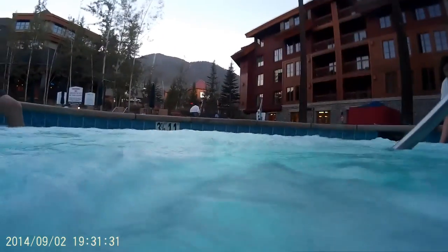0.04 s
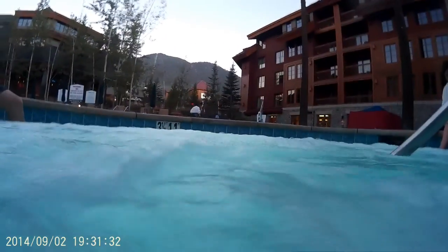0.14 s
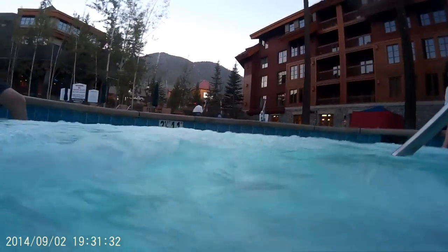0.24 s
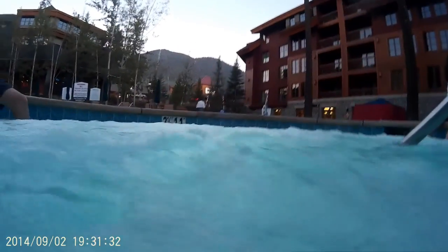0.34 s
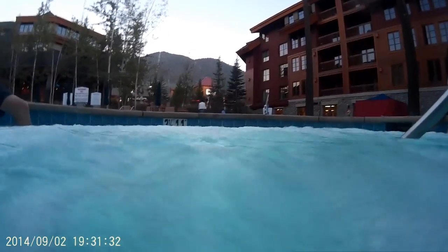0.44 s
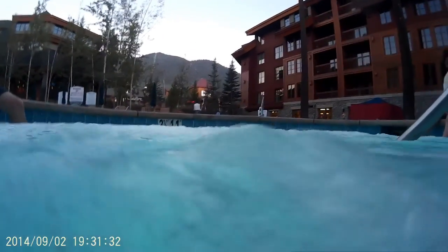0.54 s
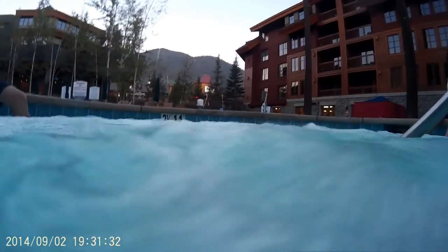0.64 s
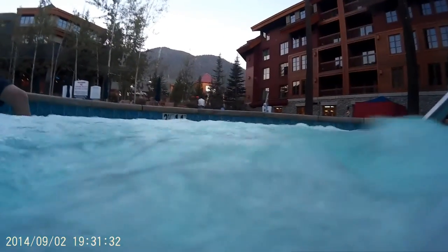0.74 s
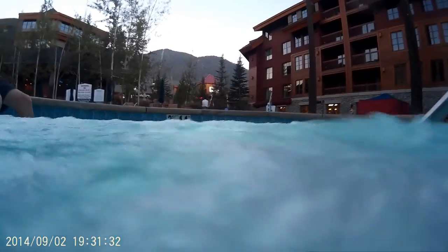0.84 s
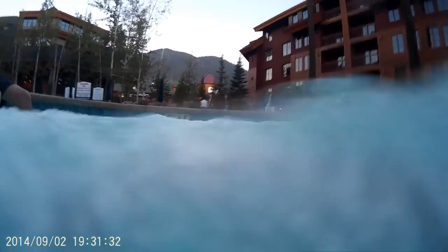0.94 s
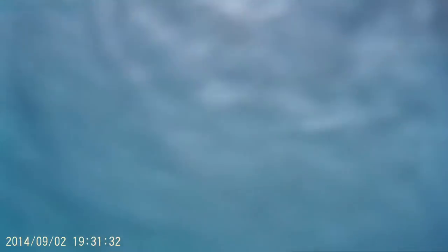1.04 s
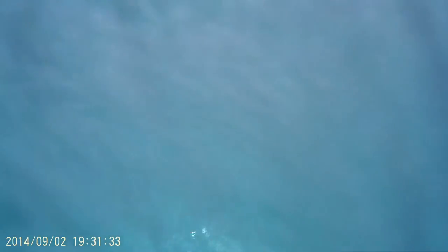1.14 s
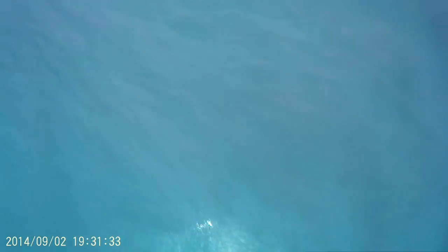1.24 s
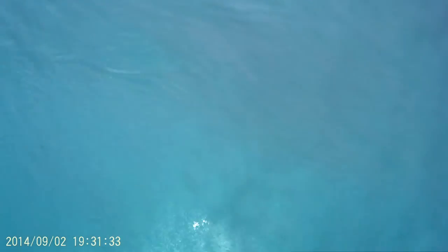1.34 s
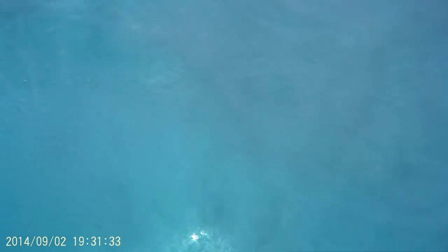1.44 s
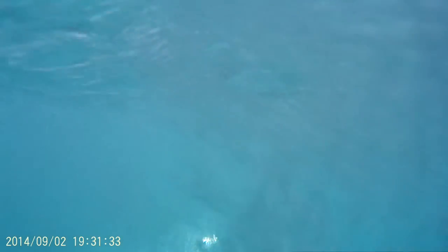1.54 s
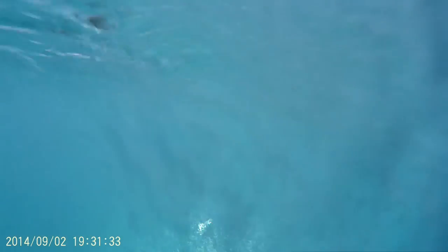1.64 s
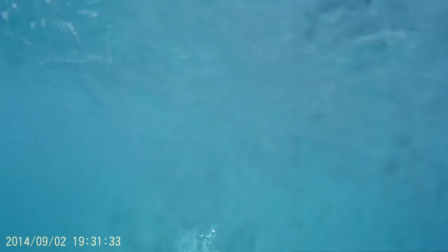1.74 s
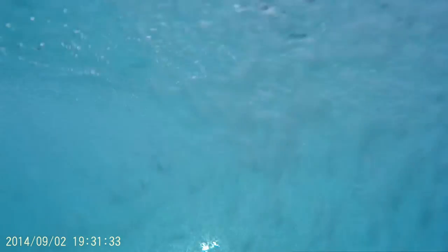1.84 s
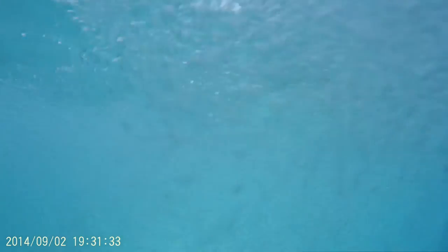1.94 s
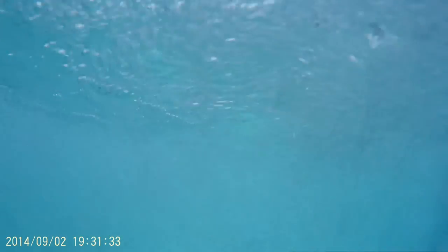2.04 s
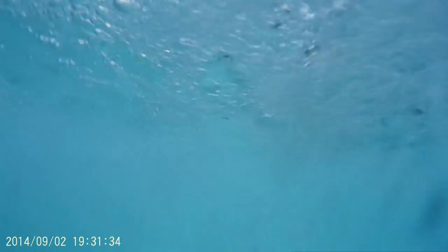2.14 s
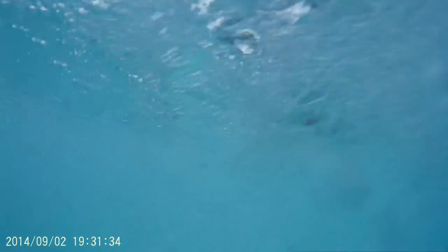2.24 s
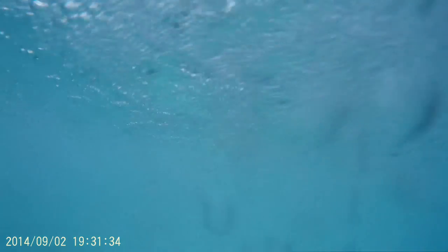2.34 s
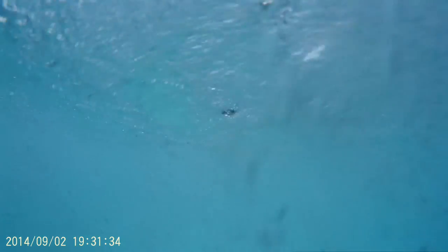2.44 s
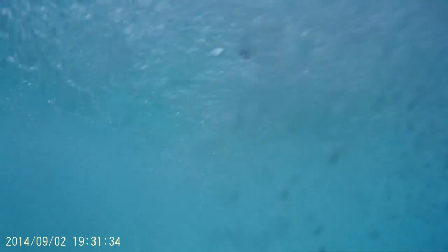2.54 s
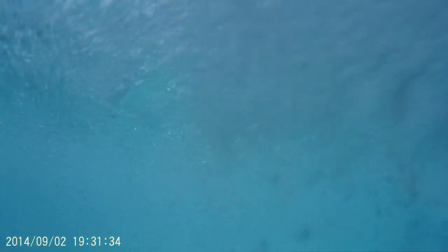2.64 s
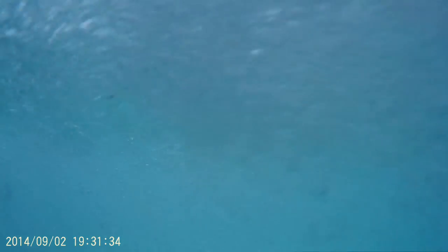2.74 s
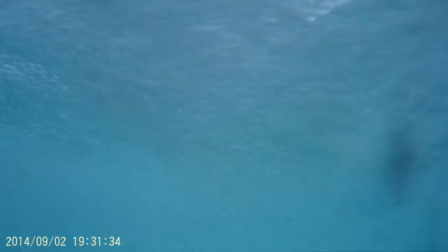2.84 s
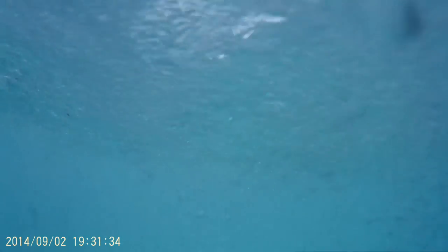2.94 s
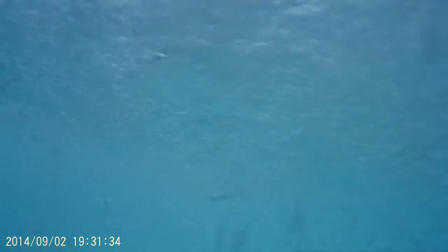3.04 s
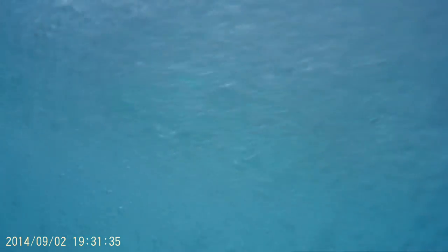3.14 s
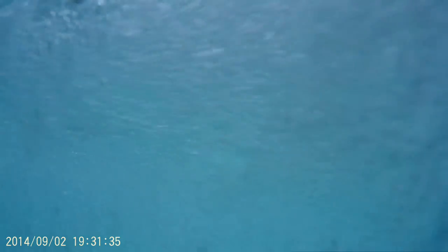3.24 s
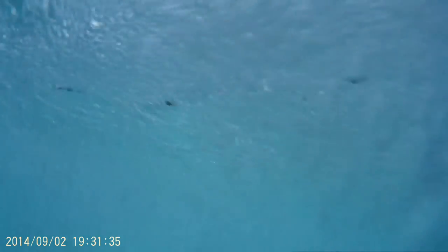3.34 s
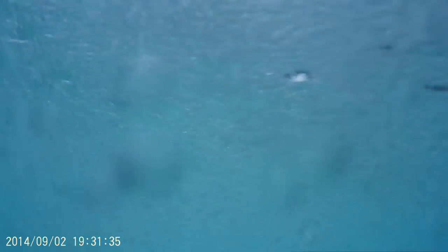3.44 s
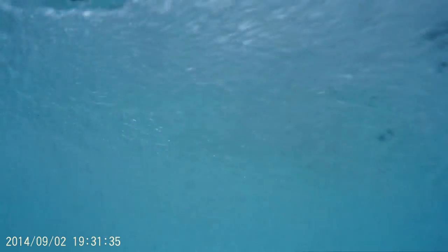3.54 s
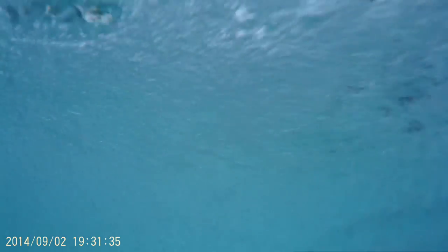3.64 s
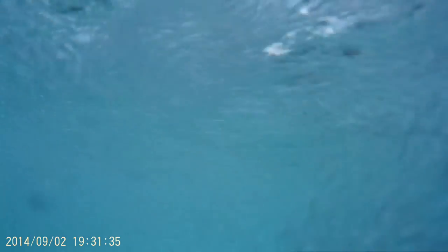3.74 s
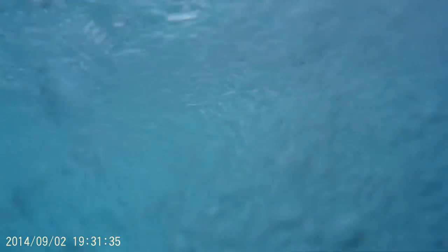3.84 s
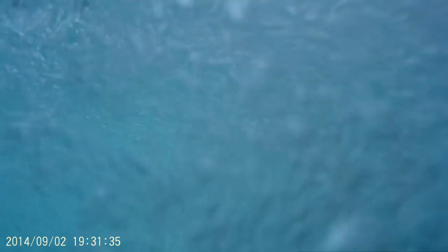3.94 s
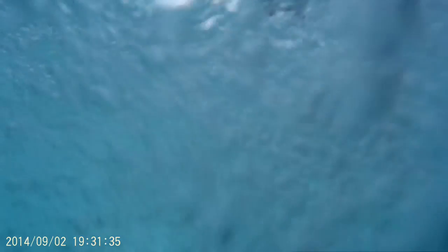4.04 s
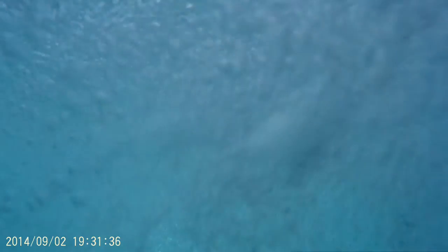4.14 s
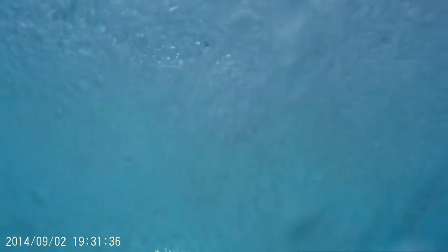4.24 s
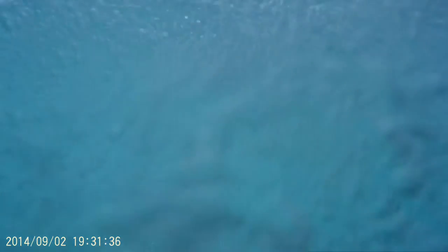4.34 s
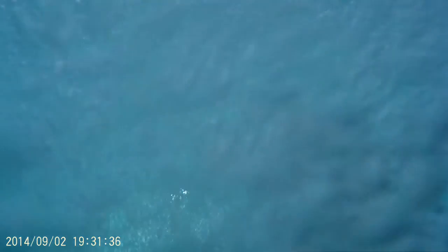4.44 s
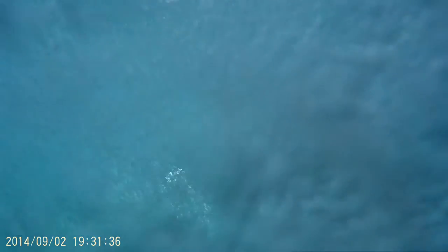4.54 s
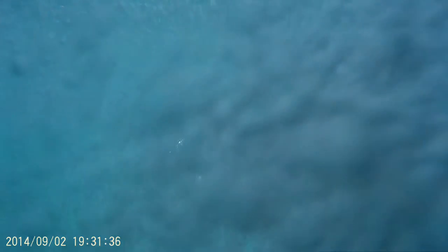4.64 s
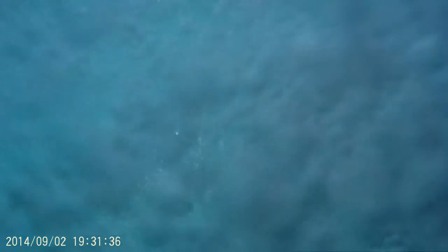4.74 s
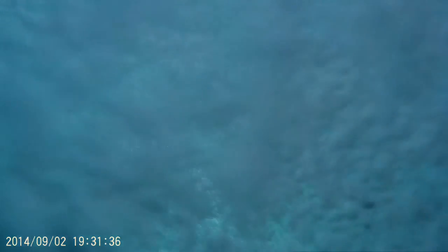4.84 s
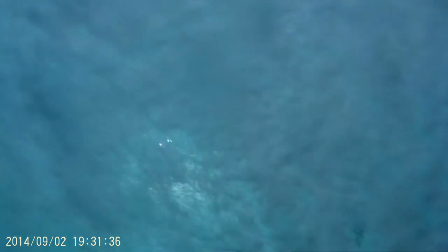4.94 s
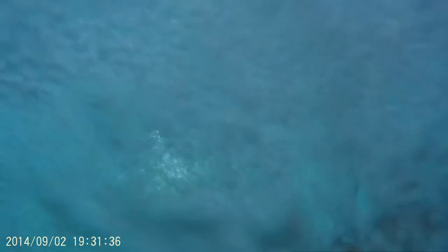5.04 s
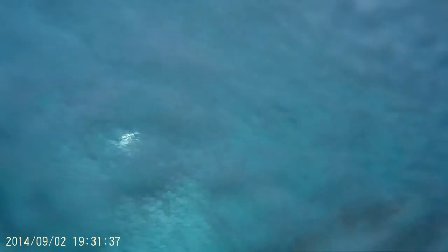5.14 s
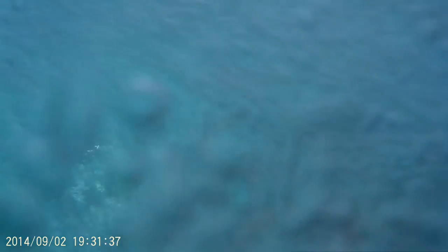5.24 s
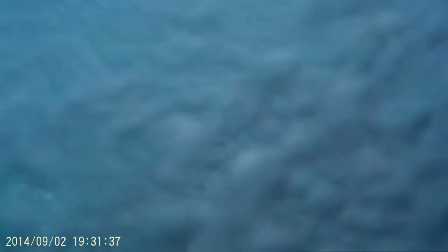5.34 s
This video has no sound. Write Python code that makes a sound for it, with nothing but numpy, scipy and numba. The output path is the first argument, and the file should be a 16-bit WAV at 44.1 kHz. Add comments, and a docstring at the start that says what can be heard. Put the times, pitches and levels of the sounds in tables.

```python
"""Hot tub, under water: a small camera in a sealed housing sinks from the churning surface towards the jets.
Big air pockets throb as a low rumble, made of overlapping sine bubbles that swell, die away and rise in pitch.
Nearby single bubbles plop and tick, and a cloud of small ones fizzes, crackles and surges.
Behind them lie a shaped noise hiss and thin, wavering high whines."""
import sys
import numpy as np
from scipy import signal
from scipy.fft import rfft, irfft
from scipy.io import wavfile
from scipy.ndimage import uniform_filter1d
from numba import njit

SR = 44100
rng = np.random.default_rng(int(sys.argv[2]) if len(sys.argv) > 2 else 0)


def output_pcm(signal):
    """Save a mono or channel-first signal as 16-bit PCM at the path in sys.argv[1].

    Samples are clipped to [-1, 1] before scaling.
    """
    pcm = np.clip(np.atleast_2d(signal).T, -1, 1) * 32767
    wavfile.write(sys.argv[1], SR, np.round(pcm).astype(np.int16))


N = 237072  # length in samples

# Jet rumble over time. Each row: time in seconds, level in dB, centre pitch of the air pockets in Hz.
JET_RUMBLE = [(0.0, -57, 135), (0.66, -62.5, 126), (1.11, -46.5, 153), (1.2, -39.5, 175), (1.68, -32, 127),
              (1.87, -37, 142), (2.05, -24, 120), (2.5, -26, 126), (2.87, -26, 138), (3.19, -27, 148),
              (3.52, -20, 145), (3.79, -22, 119), (3.92, -25, 138), (4.18, -21.5, 163), (4.54, -20.5, 192),
              (4.81, -30.5, 145), (5.21, -26.5, 166), (5.33, -34, 142), (5.38, -22, 134)]
# Tone of the air pockets. Each row: pitch in Hz, relative strength in dB.
POCKET_TONE = [(40, -61), (60, -2), (78, -4.5), (100, -4.5), (140, -3), (200, -4), (260, -5.5), (340, -8.5)]
# Single bubbles near the housing. Each row: time in seconds, peak in dB, pitch in Hz,
# spray of smaller bubbles in dB relative to the peak.
CLOSE_BUBBLES = [(0.0196, -39, 2000, -4), (0.088, -40.5, 1270, -30), (0.092, -41, 1650, -30),
                 (0.0978, -36, 3160, -37), (0.1004, -33.5, 2150, -38), (0.249, -42.5, 11300, -30),
                 (0.3366, -49, 480, -30), (0.396, -46, 2130, -1.5), (0.421, -43, 1480, -3),
                 (0.4999, -35, 1230, -5), (0.5026, -44, 2450, -30), (0.5073, -45, 8900, -30),
                 (0.5251, -39.5, 10600, -30), (0.5616, -44, 4080, -30), (0.574, -44, 3630, -30),
                 (0.6168, -38, 3650, -30), (0.6194, -38.5, 6800, -30), (0.6198, -38.5, 653, -30),
                 (0.622, -34.5, 3020, -26), (0.666, -48, 11000, -30), (0.7346, -37.5, 1220, -30),
                 (0.7345, -46, 534, -30), (0.7944, -47.5, 10200, -40), (0.8187, -42, 1030, -30),
                 (1.0177, -49, 10500, -30), (1.028, -48, 3120, -30), (1.0465, -41.5, 8690, -30),
                 (1.0797, -40.5, 2260, -32), (1.0809, -33, 3820, -16), (1.1402, -40, 2210, 2.5),
                 (1.17, -39, 7550, -30), (1.2037, -46, 10100, -30), (1.258, -45, 11300, -30),
                 (1.364, -48, 5400, -30), (1.381, -44, 4650, -30), (1.4352, -39.5, 1220, -30),
                 (1.438, -35, 3800, -24), (1.471, -39, 3600, -7.5), (1.477, -35, 1550, -8),
                 (1.496, -40, 3930, -30), (1.5005, -47, 1740, -30), (1.502, -33, 4120, -33),
                 (1.5213, -41, 9750, -30), (1.521, -42.5, 3070, -11), (1.567, -42, 4970, -30),
                 (1.568, -39.5, 8550, -30), (1.594, -48, 10100, -30), (1.601, -31.5, 460, -32),
                 (1.6023, -33, 730, -9), (1.6813, -40.5, 1710, -27), (1.6898, -51, 6540, -28),
                 (1.8119, -28, 202, -33), (1.944, -42, 530, -28), (2.005, -44.5, 3400, -30),
                 (2.0359, -47, 2000, -33), (2.121, -25, 269, -34), (2.123, -28, 145, -28),
                 (2.1599, -36.5, 2970, -17), (2.225, -44, 11700, -30), (2.378, -15.5, 189, -37),
                 (2.419, -38, 650, -30), (2.4371, -19, 261, -30), (2.443, -47.5, 3840, -34),
                 (2.494, -26.5, 318, -30), (2.524, -46, 2700, -30), (2.5345, -38.5, 10770, -30),
                 (2.6066, -41, 820, -30), (2.6312, -43.5, 4200, -30), (2.6441, -43.5, 12000, -30),
                 (2.6636, -42, 3660, -30), (2.681, -42, 3320, 3), (2.7435, -22.5, 144.8, -32),
                 (2.8203, -17.5, 193, -30), (2.832, -46, 4340, -30), (2.848, -35, 3580, -30),
                 (2.86, -25, 251, -30), (2.8769, -18.5, 192, -39), (2.892, -43.5, 10400, -30),
                 (2.9325, -40.5, 3760, -30), (3.0105, -41.5, 11500, -16), (3.0935, -27, 567, -30),
                 (3.096, -38, 2000, -30), (3.119, -27, 303, -42), (3.2817, -46, 12400, -30),
                 (3.317, -32.5, 11600, -30), (3.3928, -20, 220, -41), (3.4557, -24, 176, -30),
                 (3.4712, -15, 157.3, -39), (3.475, -35.5, 3440, -32), (3.4941, -25, 1710, -16),
                 (3.494, -23, 8930, -32), (3.5034, -32, 3030, -35), (3.516, -33, 2870, -30),
                 (3.521, -30.5, 1480, -10), (3.524, -37, 7750, -4), (3.5397, -23.5, 3780, -35),
                 (3.552, -19.5, 198, -30), (3.5605, -12, 131, -40), (3.5834, -28, 3720, -10),
                 (3.59, -31, 3350, -30), (3.5936, -15, 137.7, -14.5), (3.605, -31, 1900, 7),
                 (3.61, -30, 4900, -17), (3.617, -22.5, 3770, -30), (3.631, -24.5, 1890, -18),
                 (3.6348, -22, 754, -30), (3.6577, -38, 11000, -30), (3.658, -37, 1530, -4),
                 (3.6778, -23.5, 2600, -33), (3.688, -32, 8270, -30), (3.6958, -33, 7040, -30),
                 (3.741, -31, 1600, -5.5), (3.759, -43, 5550, -3), (3.775, -35.5, 4660, -30),
                 (3.8011, -41, 7740, -3), (3.8116, -44, 9410, -30), (3.838, -25.5, 1550, -6),
                 (3.8433, -34.5, 8500, -30), (3.9391, -33, 10350, -30), (3.991, -30, 3350, -5),
                 (4.0644, -39, 2300, -30), (4.0839, -44, 5300, -18), (4.0983, -24, 335, -30),
                 (4.1289, -27.5, 195, -37), (4.138, -37, 3320, -30), (4.142, -40, 3450, -30),
                 (4.1591, -40, 8050, -30), (4.1688, -19, 199.4, -32), (4.1788, -36.5, 3500, -30),
                 (4.184, -33, 3220, -30), (4.1879, -18.5, 185, -23), (4.1857, -43, 9600, -30),
                 (4.1958, -35, 10300, -30), (4.1995, -35.5, 5440, -6), (4.232, -27.5, 3130, -33),
                 (4.2574, -11.5, 154.7, -27), (4.261, -42, 10800, -30), (4.27, -26, 3120, -15),
                 (4.3044, -31.5, 7650, -30), (4.306, -29, 1620, -24), (4.3142, -30, 6300, -25),
                 (4.3135, -27, 2820, -28), (4.3245, -29, 2360, -2), (4.3654, -36.5, 10400, -30),
                 (4.3987, -28.5, 2150, -37), (4.4128, -17.5, 212, -27), (4.4315, -45, 12000, -24),
                 (4.4335, -16, 177.5, -35), (4.4698, -19, 132, -34), (4.4812, -26, 5420, -23),
                 (4.4814, -33, 2000, -3), (4.5243, -14, 201, -45), (4.55, -29, 1570, -9),
                 (4.5584, -21, 237, -30), (4.568, -16, 168, -28), (4.6227, -33, 10200, -33),
                 (4.623, -37, 3560, -30), (4.6338, -40, 11900, -30), (4.6585, -37, 11200, -30),
                 (4.6575, -31.5, 1760, -11), (4.6965, -46, 5730, -36), (4.751, -45, 5000, -30),
                 (4.7562, -34, 1950, -30), (4.7593, -30, 2380, -10.5), (4.8245, -19.5, 540, -46),
                 (4.8346, -27.5, 672, -32), (4.8504, -37.5, 3900, -30), (4.868, -45, 10500, -30),
                 (4.9226, -36, 3730, -30), (4.9336, -26.5, 286, -26), (4.9917, -36, 2760, -30),
                 (5.028, -37, 3300, -30), (5.0429, -38, 3080, -9), (5.118, -43.5, 4700, -30),
                 (5.168, -43, 10700, -30), (5.181, -42.5, 10300, -30)]
# Smaller bubbles in each spray. Each row: pitch as a ratio to the parent's, trim in dB on the spray level.
SPRAY_BUBBLES = [(1.6, 2), (2.3, 1), (3.4, -11.5)]
# Round bubbles that leave without a snap. Each row: time in seconds, peak in dB, pitch in Hz,
# length above half peak in milliseconds, pitch rise over that length as a fraction.
ROUND_BUBBLES = [(1.7601, -30, 1185, 7.2, 0.2), (1.948, -35.5, 1040, 2.8, .03),
                 (2.34, -26.5, 1450, 1.65, .05), (2.4, -34, 1510, 3, 0.055),
                 (2.4212, -28.5, 1510, 3, 0.046), (2.6064, -20, 544, 4, .03),
                 (2.9857, -26.5, 1540, 2.2, 0.053), (3.0934, -30.5, 1150, 3.5, .03),
                 (4.183, -18, 1740, 2.5, 0.041), (4.587, -19, 1980, 1.4, 0.038),
                 (4.6043, -30, 1830, 3.3, .03), (4.8271, -17.5, 797, 8.2, 0.016),
                 (5.077, -39, 2970, 3.8, .02)]
# Bubble cloud between surges. Each row: time in seconds, relative level in dB.
CLOUD_BED = [(0, -61), (0.3, -63.5), (0.85, -57), (1.9, -58), (2.6, -55.5), (3.4, -55), (4.1, -54.5),
             (4.5, -48), (5.38, -51.5)]
# Surges of froth sweeping past the housing. Each row: time of the peak in seconds, relative level in dB.
FROTH_SURGES = [(0.11, -56.5), (0.55, -51.5), (1.47, -53), (2.302, -52), (2.9, -52), (3.53, -41.5),
                (3.62, -35), (3.78, -42), (4.2, -45), (4.322, -37), (4.78, -49)]
# Larger bubbles further off. Each row: time in seconds, level in dB.
LARGE_BUBBLES = [(0.0, -95), (0.37, -67.5), (0.55, -61.5), (1.8, -44.5), (2.44, -42), (2.86, -45.5),
                 (3.76, -40.5), (4.55, -47), (4.69, -43.5), (5.38, -41.5)]
# Resonances of the shell. Each row: centre in Hz, width in Hz, gain in dB.
SHELL_MODES = [(512, 150, 7.5), (1340, 180, -14), (1664, 760, 12.5), (2880, 450, 5), (3600, 170, -10),
               (4960, 230, -52)]
# Tone of the hiss. Each row: frequency in Hz, relative density in dB per Hz.
HISS_TONE = [(25, 2.5), (60, -22), (200, -29), (1000, -19.5), (4000, -38.5), (8000, -35), (12000, -35),
             (15500, -45)]
# The hiss grows a little under water. Each row: time in seconds, gain in dB.
HISS_GROWTH = [(0, -2.5), (1.5, -1.5), (2.1, 1), (5.38, 3)]
# Thin whines. Each row: start in seconds, fade-in in seconds, pitch in Hz, RMS wavering in Hz, level in dB.
WHINE_TONES = [(1.0, 1.0, 9545, 35, -77.5), (5.0, .04, 7380, 80, -75), (5.0, .04, 11900, 120, -80),
               (5.0, .04, 13200, 140, -79)]

SURGE_RISE_DB_PER_S, SURGE_FALL_DB_PER_S = 160, 110
RING_CYCLES, RING_CYCLES_PER_KHZ = 3.83, 0.48  # cycles above half peak: smaller bubbles ring a few more
HALF_PEAK_START, HALF_PEAK_SPAN = .23, 2.45  # when a bubble passes half its peak and for how long, in taus
HISS_DB = -55.5  # before its slow growth
TOP_HZ = 15600


def jets():
    """Overlapping air pockets throb; those near the drifting centre pitch are the strongest."""
    db, centre_hz = columns(JET_RUMBLE)

    def colour(i, hz):
        octaves_off = np.log2(hz / centre_hz[i])
        return on_log(hz, POCKET_TONE) - 9.9 * octaves_off ** 2

    pockets = swarm(count=1600, low_hz=40.5, high_hz=338, cycles=1.0, spread_db=-1.0, glide=0.038,
                    colour_db=colour)
    return undb(db) * pockets


def close_bubbles(shed_db=-9, late_taus=2.5, detune=0.17):
    """Each close bubble snaps off, jolting the shell, sheds two neighbours a little off in pitch, and may spray."""
    s, db, hz, spray_db = np.transpose(CLOSE_BUBBLES)
    tau = ring_time(hz)
    start = s * SR - HALF_PEAK_START * tau
    chance = rng.random((17, len(s)))
    out = ring(N, start, hz, tau, undb(db), 2 * np.pi * chance[0], .005)
    for lag, off, phase in (chance[1:4], chance[4:7]):
        shed_start = start + late_taus * tau * (.5 + lag)
        shed_hz = hz * (1 + detune * (2 * off - 1))
        out += ring(N, shed_start, shed_hz, tau, undb(db + shed_db), 2 * np.pi * phase, .01)
    out += spray(s, db + spray_db, hz, chance[8:].reshape(3, 3, -1))
    return out + housing(snap(s, db, hz, chance[7]))


def spray(s, db, hz, chance, within_ms=3.1, scatter=0.17):
    """Smaller bubbles follow their parent within milliseconds, at scattered pitches."""
    out = np.zeros(N)
    for (ratio, trim_db), (lag, off, phase) in zip(SPRAY_BUBBLES, chance):
        start = s * SR + lag * within_ms * SR / 1000
        small_hz = np.minimum(hz * ratio * (1 + scatter * (2 * off - 1)), 11500)
        out += ring(N, start, small_hz, ring_time(small_hz), undb(db + trim_db), 2 * np.pi * phase, .01)
    return out


def snap(s, db, hz, phase, snap_db=1.5, cycles=0.29):
    """A fraction of a cycle makes a broad snap; the big slow pockets leave softly."""
    sharp = np.clip(np.log2(hz / 400) / 2.08, 0, 1)
    return ring(N, s * SR, hz, cycles * SR / hz, sharp * undb(db + snap_db), 2 * np.pi * phase, 0.)


def round_bubbles():
    """Round bubbles ring cleanly and rise in pitch, one of them steeply."""
    s, db, hz, ms, rise = np.transpose(ROUND_BUBBLES)
    tau = ms * SR / 1000 / HALF_PEAK_SPAN
    start = s * SR - HALF_PEAK_START * tau
    phase = 2 * np.pi * rng.random(len(s))
    out = np.zeros(N)
    for k in range(len(s)):
        one = slice(k, k + 1)
        out += ring(N, start[one], hz[one], tau[one], undb(db[one]), phase[one], rise[k] / HALF_PEAK_SPAN)
    return out


def cloud():
    """Fizz, larger bubbles, crackles and froth; bubbles break up in clumps, many sizes at once."""
    db = froth_db()
    # noise smoothed twice makes clumps a few milliseconds long
    clumps = uniform_filter1d(rng.standard_normal(N), size=100)
    clumps = level(uniform_filter1d(clumps, size=100), 0)
    return fizz_bed(db, clumps) + large_bubbles() + crackle(db, clumps) + froth(db, clumps)


def fizz_bed(db, clumps, wash_db=-1, flicker_db=1.1):
    """A dense fizz and a far wash ring the shell; bubbly water soaks up the treble of what is far away."""
    fizz = swarm(count=6000, low_hz=480, high_hz=5730, cycles=1.0, spread_db=-1.0, glide=0.14,
                 colour_db=lambda i, hz: -1.5 * np.log2(hz / 1500))
    wash = level(rng.standard_normal(N), wash_db)
    far = signal.lfilter(*signal.butter(3, 4600, fs=SR), fizz + wash)
    flicker = undb(flicker_db * clumps)
    return undb(db) * level(housing(far) * flicker, 1.0)


def large_bubbles():
    """Larger bubbles further off, the lower pitches stronger."""
    (db,) = columns(LARGE_BUBBLES)
    large = swarm(count=6000, low_hz=297.5, high_hz=953, cycles=1.38, spread_db=3.0, glide=0.026,
                  colour_db=lambda i, hz: -5.0 * np.log2(hz / 500))
    return undb(db) * large


def crackle(db, clumps, crowding=2.1, swell=.35, clump_db=12):
    """Distinct small bubbles come both denser and louder in surges."""
    crackles = swarm(count=1100, low_hz=1500, high_hz=12000, cycles=1.8, spread_db=2.5, glide=.01,
                     colour_db=lambda i, hz: swell * db[i] - 2.6 * np.log2(hz / 3000),
                     crowd=undb(crowding * db + clump_db * clumps))
    return undb(-54.5) * crackles


def froth(db, clumps):
    """Surges also carry a froth of rounder, ringing bubbles."""
    bubbles = swarm(count=500, low_hz=450, high_hz=4970, cycles=2.64, spread_db=1.0, glide=0.031,
                    colour_db=lambda i, hz: 0.13 * db[i] - 6.6 * np.log2(hz / 1500),
                    crowd=undb(3.1 * db + 6 * clumps))
    return undb(-53.5) * bubbles


def froth_db():
    """Level of the bubble cloud: a slow bed, and surges that rise and ebb steadily in dB around their peaks."""
    (bed_db,) = columns(CLOUD_BED)
    s, db = np.transpose(FROTH_SURGES)[:, :, None]
    after = np.arange(N) / SR - s
    surges_db = db - np.where(after < 0, -SURGE_RISE_DB_PER_S, SURGE_FALL_DB_PER_S) * after
    power = undb(2 * bed_db) + undb(2 * surges_db).sum(axis=0)
    return 10 * np.log10(power)


def hiss():
    """Noise floor of the microphone: white noise shaped in the spectrum, growing slightly."""
    hz = np.maximum(np.arange(N // 2 + 1) * SR / N, 1)
    spectrum = rfft(rng.standard_normal(N)) * undb(on_log(hz, HISS_TONE))
    (growth_db,) = columns(HISS_GROWTH)
    return level(irfft(spectrum, N), HISS_DB) * undb(growth_db)


def whines():
    """Thin sines fade in and stay, wavering in pitch and level with smoothed noise."""
    t = np.arange(N) / SR
    out = np.zeros(N)
    for start, fade_in, hz, waver_hz, db in WHINE_TONES:
        waver = level(uniform_filter1d(rng.standard_normal(N), size=120), 0)
        tone = np.sin(2 * np.pi * np.cumsum(hz + waver_hz * waver) / SR)
        flutter = undb(3 * waver[::-1])  # reversed, so level and pitch waver apart
        out += np.clip((t - start) / fade_in, 0, 1) * level(tone * flutter, db)
    return out


def housing(x, direct=.3):
    """What strikes the shell rings its resonances."""
    return direct * x + sum(undb(gain_db) * band(x, hz, width) for hz, width, gain_db in SHELL_MODES)


def swarm(count, low_hz, high_hz, cycles, spread_db, glide, colour_db, crowd=np.ones(N)):
    """Bubbles at random moments, denser where crowd is high, with pitches even on a log scale."""
    when, pitch, big, phase, long = rng.random((count, 5)).T
    start = np.interp(when, np.cumsum(crowd) / np.sum(crowd), np.arange(N))
    hz = low_hz * (high_hz / low_hz) ** pitch
    # a positive spread makes a few much stronger, a negative one a few weaker
    size_db = -spread_db * np.log(1 - .98 * big) + colour_db(start.astype(int), hz)
    tau = (.5 + long) * cycles * SR / hz
    return level(ring(N, start, hz, tau, undb(size_db), 2 * np.pi * phase, glide), 0)


@njit
def ring(n, start, hz, tau, size, phase, glide):
    """Each bubble swells within tau samples, dies away, and rises in pitch if glide is above zero."""
    out = np.zeros(n)
    for k in range(len(start)):
        p = phase[k]
        for i in range(int(8 * tau[k])):
            j = int(start[k]) + i
            if j >= n:
                break
            u = i / tau[k]
            p += 2 * np.pi * min(hz[k] * (1 + glide * u), 20000.) / SR
            out[j] += size[k] * u * np.exp(1 - u) * np.sin(p)
    return out


def ring_time(hz):
    """Swell time in samples, from the number of cycles a bubble stays above half its peak."""
    cycles = RING_CYCLES + RING_CYCLES_PER_KHZ * hz / 1000
    return cycles * SR / hz / HALF_PEAK_SPAN


def band(x, hz, width):
    """One resonance, as a peak filter with its width in Hz."""
    return signal.lfilter(*signal.iirpeak(hz, hz / width, fs=SR), x)


def undb(db):
    """Decibels to amplitude."""
    return 10 ** (np.asarray(db) / 20)


def level(x, db):
    """Bring the RMS of x to db."""
    return x * undb(db) / np.sqrt(np.mean(x ** 2))


def columns(table):
    """Every column of a curve table after the time, one value per sample."""
    s, *rest = np.transpose(table)
    return [np.interp(np.arange(N) / SR, s, c) for c in rest]


def on_log(hz, table):
    """Read a tone curve along a log frequency scale."""
    table_hz, db = np.transpose(table)
    return np.interp(np.log(hz), np.log(table_hz), db)


def scene():
    """The water sources, with the microphone's hiss and the whines beneath."""
    water = jets() + close_bubbles() + round_bubbles() + cloud()
    # the microphone behind its membrane loses the deepest bass
    water = signal.sosfilt(signal.butter(3, 60, "high", fs=SR, output="sos"), water)
    return (water + hiss() + whines())[None, :]


def record(dry):
    """The recorder cuts the top with a steep low-pass."""
    return signal.sosfilt(signal.ellip(12, .2, 60, TOP_HZ, fs=SR, output="sos"), dry)


dry = scene()
out = record(dry)
output_pcm(out)
```